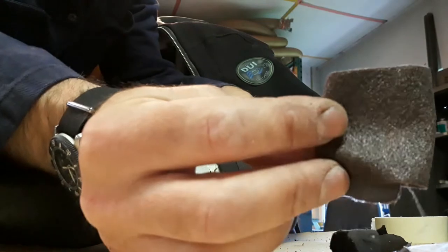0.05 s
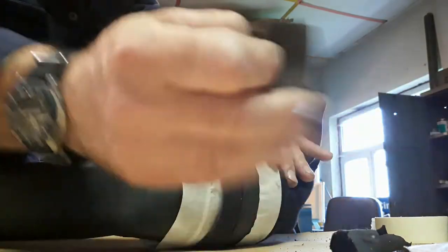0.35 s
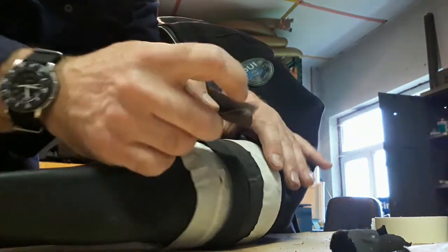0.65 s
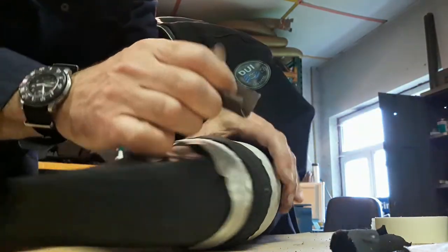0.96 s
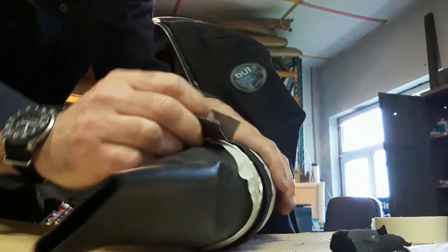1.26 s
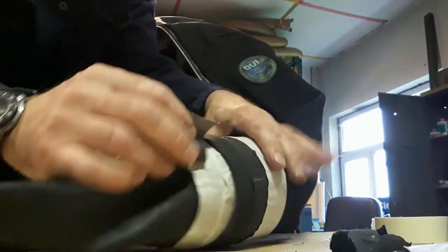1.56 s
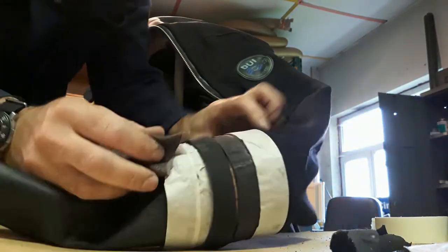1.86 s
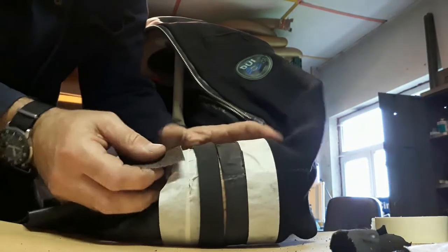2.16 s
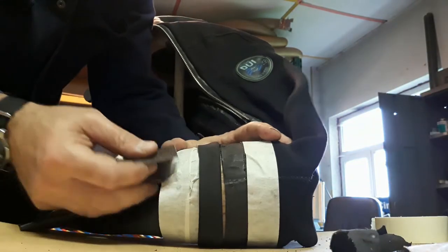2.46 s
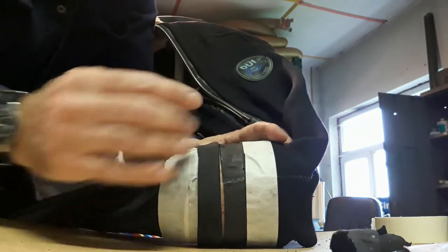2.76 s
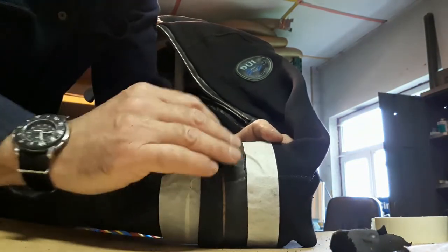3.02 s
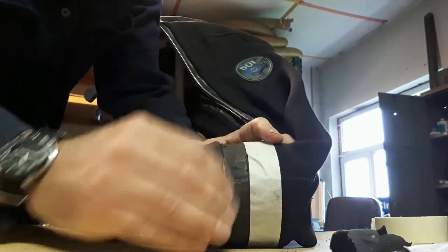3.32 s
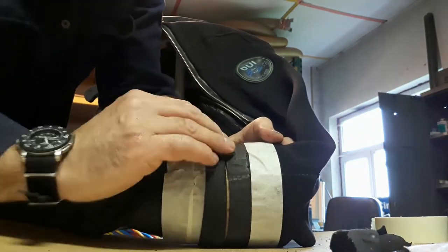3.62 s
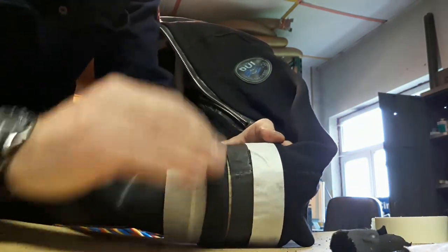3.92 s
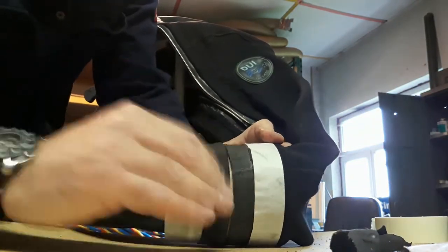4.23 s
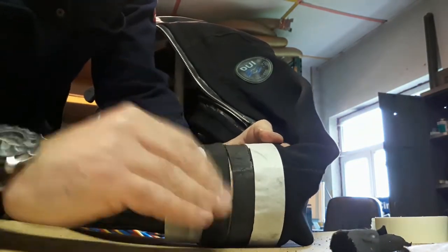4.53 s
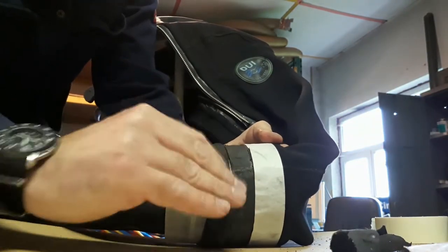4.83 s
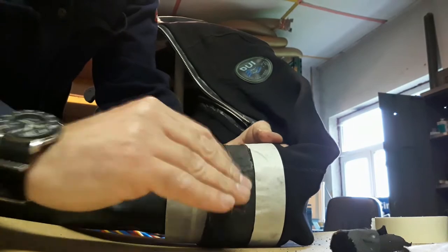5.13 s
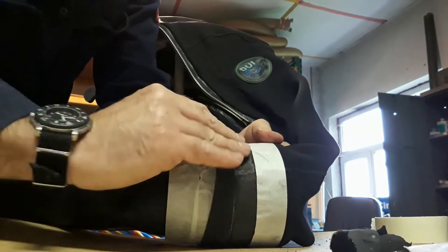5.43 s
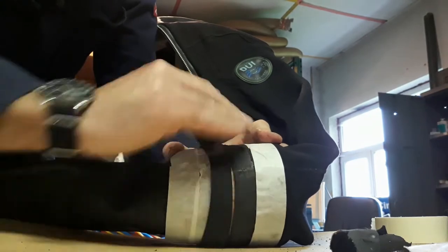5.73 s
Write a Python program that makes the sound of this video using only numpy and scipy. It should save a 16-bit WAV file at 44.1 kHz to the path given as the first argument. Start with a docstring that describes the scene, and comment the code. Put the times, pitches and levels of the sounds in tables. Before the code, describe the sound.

A taped rubber sleeve is turned on a workbench, rustling, swishing and knocking softly, with one brief creak from an abrasive pad. The stiff pad crackles in the fingers. Then it scrubs the rubber in quick, gritty strokes, about three a second, many landing with a dull thud that rings the bench. The microphone is close in a small room with faint rumble and hiss.

```python
"""A workbench in a small room, the microphone close and straight ahead, over a faint rumble and hiss.
First a taped rubber sleeve is turned: it rustles, swishes and knocks, and an abrasive pad creaks briefly.
The stiff pad crackles in the fingers, most densely at 2 to 2.5 s. From 3 s it scrubs the sleeve in quick
strokes, about three a second, its grains catching and letting go. Many strokes land with a dull thud
that rings the bench, and the room answers."""
import sys
import numpy as np
from scipy import signal
from scipy.fft import rfft, irfft
from scipy.io import wavfile
from scipy.ndimage import uniform_filter1d

SR = 44100
rng = np.random.default_rng(int(sys.argv[2]) if len(sys.argv) > 2 else 0)


def output_pcm(signal):
    """Save a mono or channel-first signal as 16-bit PCM at the path in sys.argv[1].

    Samples are clipped to [-1, 1] before scaling.
    """
    pcm = np.clip(np.atleast_2d(signal).T, -1, 1) * 32767
    wavfile.write(sys.argv[1], SR, np.round(pcm).astype(np.int16))


N = 259308
TIME = np.arange(N) / SR
CONTROL_TIME = TIME[::32]
TAPS = 4096
HZ = np.fft.rfftfreq(TAPS, 1 / SR)

# Steady rumble and hiss. Each row: frequency in Hz, relative level in dB.
BACKGROUND_COLOUR = [(18, -34), (30, -2), (102, 12), (328, 0.5), (426, -8), (662, -16), (4540, -21),
                     (6200, -38), (7430, -10), (10200, -11), (12200, -11), (15000, -56)]
# Decay of the room. Each row: frequency in Hz, time to fall 60 dB in seconds.
ROOM_DECAY = [(150, 0.7), (400, 0.84), (1000, 1.13), (1400, 0.5), (2800, 0.41), (7300, 0.64), (14000, 0.06)]
# Tone of the reflections. Each row: frequency in Hz, relative level in dB.
ROOM_COLOUR = [(100, -2.5), (500, 0), (950, -5.5), (1350, 10), (2000, 1), (3000, -1), (5200, -3.5),
               (9000, -2.5), (14000, 11.5)]
# Resonances of sleeve and bench. Each row: frequency in Hz, relative level in dB, t60 in seconds.
BENCH_MODES = [(84.6, -1.5, 0.14), (109, -0.5, 0.15), (149.7, 6, 0.1), (216.7, 1.5, 0.15),
               (300, -35, 0.046)]
# The hand lands on the sleeve. Each row: start in seconds, peak in dB, length of the push in seconds,
# level of the long low ring in dB.
HAND_THUDS = [(3.546, -43, 0.0032, -47.5), (3.617, -38.5, 0.0031, -62), (4.008, -32.5, 0.0072, -64),
              (4.133, -40, .01, -74), (4.331, -29.5, .0063, -58), (4.636, -30.5, 0.0065, -51.5),
              (4.744, -51.5, .003, -59), (4.927, -40, .0074, -47), (5.28, -41, 0.0026, -46.5),
              (5.434, -46, 0.0021, -49)]
# Bumps of the hollow sleeve. Each row: start in seconds, level in dB, pitch in Hz, t60 in seconds.
SLEEVE_KNOCKS = [(0.573, -45, 215, .14), (0.729, -46, 260, 0.067), (1.155, -42, 400, 0.033),
                 (1.972, -34, 655, 0.034), (2.012, -37.5, 196, 0.037), (2.919, -53, 205, 0.066),
                 (5.269, -38, 218, 0.13), (5.435, -45, 183.4, .12)]
# Pitched slides on tight rubber. Each row: start and end in seconds, first and last pitch in Hz,
# level in dB.
RUBBER_SWISHES = [(0.483, 0.625, 1100, 1120, -59), (1.221, 1.413, 393, 451, -60.5),
                  (1.243, 1.336, 4690, 5410, -47), (1.331, 1.403, 4045, 3700, -47.5),
                  (1.37, 1.425, 2700, 2284, -47), (1.74, 1.906, 3590, 3360, -44.5),
                  (1.752, 1.969, 540, 621.6, -55), (2.118, 2.193, 693, 607, -63.5),
                  (2.325, 2.407, 3060, 2890, -52.5), (3.214, 3.29, 2743, 2490, -44),
                  (3.57, 3.646, 472, 532, -57.5), (3.72, 3.879, 492, 536, -62),
                  (5.385, 5.434, 4460, 4400, -43.5)]
# The pad sticks and slips on its way down. Each row: time in seconds, typical peak in dB, slips a second.
PAD_CHATTER = [(.48, -42, 210), (.523, -29.5, 154), (0.539, -35, 80), (.59, -30, 110)]
# Fixed narrow peaks and dips that colour the rubbing and scrubbing.
# Each row: centre in Hz, width in Hz, gain in dB.
FRICTION_RIPPLE = [(987, 340, -9), (1247, 200, -4.5), (1718, 340, -7), (2720, 200, 1.5), (3154, 430, -3),
                   (3700, 160, 2), (4390, 87, 0), (5000, 270, 1), (5650, 140, 4), (6350, 110, 3.5),
                   (7260, 480, -3), (7750, 100, -11), (8930, 570, 2), (10000, 1730, -7.5), (13400, 120, 5),
                   (13900, 400, -7)]
# Tone of handled rubber. Each row: frequency in Hz, relative level in dB.
RUSTLE_COLOUR = [(29, -64), (50, -14.5), (214, -4.5), (314, -6.5), (518, -4), (876, -2.5), (1090, 0.5),
                 (1220, -6.5), (1880, -2.5), (3580, 4.5), (6820, -8.5), (8870, -7.5), (10200, -12.5),
                 (13600, -26.5), (15000, -57)]
# The sleeve turns and shifts under the hands. Each row: time in seconds, relative level in dB.
SLEEVE_TURNING = [(.08, -92), (.13, -76.5), (.41, -68.5), (.56, -55), (.77, -57.5), (.98, -65), (1.12, -68),
                  (1.16, -58), (1.42, -52.5), (1.66, -52.5), (1.8, -48), (2.03, -50), (2.12, -64.5),
                  (2.48, -61), (2.53, -54), (2.69, -82.5), (3.02, -64.5), (3.35, -74.5)]
# Fingers slide over rubber and tape. Each row: start and length in seconds, then in dB the relative
# level, swell from start to end, offset of the low part, offset of the fizz.
FINGER_RUBS = [(.112, 0.14, -67.5, 3.5, -9, -6), (.385, 0.033, -64.5, -3, -19, 1.5),
               (.46, 0.085, -52, -4, -15, -15), (.545, 0.051, -50.5, -3, -5.5, -12),
               (.81, 0.12, -57.5, 5, -28, -8.5), (1.245, 0.063, -47, -4, -11, -7),
               (1.322, 0.092, -41, -7.5, -20, -8), (1.53, 0.056, -45.5, 2.5, -3, -9),
               (1.756, .021, -35.5, -4, -14, -2.5), (1.783, 0.11, -44, 4, -14, -3.5),
               (2.155, 0.05, -49.5, 17, -8, -6.5), (2.308, 0.072, -48, -5, -5.5, -4.5),
               (2.56, 0.042, -62, 17, -10, -3.5), (2.745, 0.13, -61.5, -4.5, -3, -6.5),
               (3.47, 0.074, -64.5, 14.5, 3, -6), (5.32, 0.059, -60, -2, -18, -9.5)]
# Tone of a snap. Each row: frequency in Hz, relative level in dB.
SNAP_COLOUR = [(150, -31), (600, -7), (1200, -11.5), (1700, -8), (2400, 2), (4300, 0), (8500, 3),
               (11000, -1), (15000, -21)]
# The stiff pad snaps. Each row: start in seconds, relative peak in dB, ring pitch in Hz,
# low part and treble in dB against the middle.
PAD_SNAPS = [(0.135, -42, 3500, -35, -10.5), (.715, -32.5, 2630, -21, 0), (1.1523, -29.5, 4110, -18, 1),
             (1.4448, -25, 3820, -31, -16), (1.4602, -26.5, 2470, -20, -8), (1.5132, -14, 2600, -44, -18),
             (1.5148, -16, 4000, -35, -18), (1.7311, -20.5, 3400, -23, -3), (1.929, -20, 2710, -23, 14),
             (1.9686, -26, 3740, -18, 8), (1.9907, -15, 4100, -10.5, -5.5), (1.9959, -12, 3750, -31, -2.5),
             (2.008, -13, 3500, -39, -11), (2.011, -15.5, 4240, -7, 5), (2.019, -20, 2260, -31, -16),
             (2.0302, -15, 3350, -31, -4), (2.0364, -15, 5800, -9.5, -3.5), (2.061, -29, 4110, -22, -16),
             (2.0822, -18, 4360, -27, -8), (2.201, -15.5, 4500, -50, -19), (2.3226, -23.5, 5750, -22, -9),
             (2.425, -20, 2670, -3, 4.5), (2.4342, -12.5, 4520, -10, 0), (2.4569, -8, 6240, -39, 7),
             (2.4645, -17.5, 2850, -4.5, -1), (2.4945, -19, 2800, -15, -16), (2.5025, -9, 2580, -12, -2.5),
             (2.5076, -6.5, 4250, -33, -4.5), (2.508, -13, 2470, 5, -14.5), (3.585, -23, 4390, -25, -5),
             (4.8972, -27, 4600, -18, -6), (4.9546, -19.5, 2580, -9, -13), (5.171, -21.5, 6740, -37, 8),
             (5.1946, -15, 4740, -31, -9), (5.238, -24, 2660, -18, -33)]
# Tone of abrasive on rubber. Each row: frequency in Hz, relative level in dB.
RASP_COLOUR = [(190, -40.5), (330, -25), (447, -22.5), (1010, 2.5), (1260, -11.5), (1660, -11),
               (1880, -3.5), (2170, -7.5), (2810, -1), (4250, -1.5), (5070, -7.5), (8450, -7), (10200, -13),
               (12600, -20), (15000, -43.5)]
# The pad's edge catches as it lands or lifts. Each row: start in seconds, relative level in dB,
# offset of the fizz in dB.
EDGE_CATCHES = [(3.475, -57.5, -11), (4, -49, -5.5), (4.428, -37.5, 5.5), (4.617, -49, -10),
                (4.746, -40.5, 2), (4.892, -47.5, -4.5), (4.916, -48, -6), (5.03, -48, 4),
                (5.192, -43, -4.5), (5.232, -58, -18), (5.27, -45, -9.5), (5.386, -49, -5.5),
                (5.72, -49.5, -12)]
# Hard pushes and light returns of the pad. Each row: start and length in seconds, then in dB the relative
# level, swell from start to end, offset of the low part, offset of the fizz, relative hum of the sleeve.
PAD_STROKES = [(3.025, 0.15, -51, -3.5, -8, -8, -59), (3.177, 0.084, -45, 10, -5, -8, -55),
               (3.528, 0.086, -55.5, 14.5, 3, -6.5, -47), (3.677, 0.09, -39, 0, -20.5, -4, -46),
               (3.768, 0.084, -62, -8, -5, 0, -53), (3.993, 0.13, -43, 8, -14.5, -3.5, -46.5),
               (4.128, .062, -52, -12, -3, -1.5, -48.5), (4.322, .12, -39.5, 1.5, -14, -4, -47.5),
               (4.623, 0.14, -41, -6.5, -12, -3.5, -52.5), (4.774, 0.24, -61.5, 9, -8, -3, -59),
               (4.932, 0.11, -40.5, 6, -10.5, -6.5, -47.5), (5.193, 0.093, -47.5, -1.5, -12, -7, -52),
               (5.386, 0.056, -45, -2, -17, -5, -43), (5.433, 0.075, -36, 10, -11, -6, -43),
               (5.724, 0.06, -43, -0.5, -8.5, -9, -44), (5.841, 0.041, -31, 16.5, -14, -6, -42.5)]


def amp(db):
    """Decibels to gain."""
    return 10 ** (np.asarray(db) / 20)


def unit_rms(x):
    """Scales to rms 1."""
    return x / np.sqrt(np.mean(x ** 2) + 1e-20)


def curve_at(points, hz):
    """Reads a table on a log-frequency axis."""
    f, value = np.transpose(points)
    return np.interp(np.log(hz + 1), np.log(f + 1), value)


def at_samples(control):
    """A slow control at every sample."""
    return np.interp(TIME, CONTROL_TIME, control)


def add(mix, start_s, sound):
    """Mixes a sound in at its start time."""
    part = mix[max(round(start_s * SR), 0):][:len(sound)]
    part += sound[:len(part)]


def low_cut(x, hz):
    """Rolls off what lies below hz."""
    return signal.sosfilt(signal.butter(2, hz, "high", fs=SR, output="sos"), x)


def response(colour_db):
    """The minimum-phase impulse response that has this colour."""
    log_gain = np.log(amp(np.maximum(colour_db, -100)))
    mirrored = np.concatenate([log_gain, log_gain[-2:0:-1]])
    return irfft(np.exp(np.conj(signal.hilbert(mirrored)))[:len(HZ)])


def coloured(x, colour_db):
    """Filters by a colour, to rms 1."""
    return unit_rms(signal.oaconvolve(x, response(colour_db))[:len(x)])


def registers(colour_db, low_hz=1400, high_hz=6200):
    """Splits a colour into its low, middle and high parts."""
    low = 1 / (1 + (HZ / low_hz) ** 8)
    high = 1 - 1 / (1 + (HZ / high_hz) ** 8)
    return [colour_db + 10 * np.log10(share + 1e-9) for share in (low, (1 - low) * (1 - high), high)]


def waver(rate_hz):
    """A random wobble of rms 1, mostly slower than rate_hz."""
    hz = np.fft.rfftfreq(N, 1 / SR)
    return unit_rms(irfft(rfft(rng.standard_normal(N)) / (1 + (hz / rate_hz) ** 4), N))


def mode(hz, t60, rise_s):
    """One dying resonance with a soft start."""
    t = np.arange(SR) / SR
    return amp(-60 * t / t60) * np.sin(2 * np.pi * hz * t) * (1 - np.exp(-t / rise_s))


def slide(start, length, rise_s, fall_s):
    """The speed of one movement: it gathers, holds and dies away."""
    t = CONTROL_TIME - start
    return (1 + np.tanh(2 * t / rise_s - 1)) / 2 * np.exp(-np.maximum(t - length, 0) / fall_s)


def background(level_db=-74.5):
    """A steady low rumble and thin hiss lie behind everything."""
    return amp(level_db) * coloured(rng.standard_normal(N), curve_at(BACKGROUND_COLOUR, HZ))


def room(near, delay_s=0.004, echoes_per_s=4000):
    """Sparse reflections come back to the microphone, each band dying at its own speed."""
    echoes = rng.choice([-1., 1.], SR) * (rng.random(SR) < echoes_per_s / SR)
    echoes *= np.arange(SR) > delay_s * SR
    hz, t, spectra = signal.stft(echoes, SR, nperseg=256)
    db = curve_at(ROOM_COLOUR, hz)[:, None] - 60 * t / curve_at(ROOM_DECAY, hz)[:, None]
    tail = signal.istft(spectra * amp(db), SR, nperseg=256)[1]
    return signal.fftconvolve(near, tail / np.linalg.norm(tail))[:N]


def bench(hum_db=-4):
    """Soft pushes of the hand and the judder of the pad ring the sleeve and the bench under it."""
    t = np.arange(SR) / SR
    body = sum(amp(db - 60 * t / t60) * np.cos(2 * np.pi * hz * t) for hz, db, t60 in BENCH_MODES)
    body = low_cut(body, hz=62)
    thuds = np.zeros(N)
    for start, db, length, ring_db in HAND_THUDS:
        push = np.sin(2 * np.pi * np.minimum(t / length, 1))  # the rubber gives and springs back
        thud = signal.fftconvolve(body, push)[:SR]
        add(thuds, start, amp(db) * thud / abs(thud).max())
        # one lightly damped resonance of the bench outlasts the rest
        add(thuds, start, amp(ring_db) * mode(hz=193.3, t60=0.74, rise_s=0.0018))
    pressing = sum((amp(db + hum_db) * slide(start, length, rise_s=0.018, fall_s=0.017)) ** 2
                   for start, length, *_, db in PAD_STROKES)
    judder = rng.standard_normal(N) * at_samples(np.sqrt(pressing))
    hollow = low_cut(body, hz=120)
    hum = signal.fftconvolve(judder, hollow / np.linalg.norm(hollow))[:N]
    return thuds + hum


def sleeve_knocks():
    """Each bump rings one dull resonance of the hollow sleeve."""
    out = np.zeros(N)
    for start, db, hz, t60 in SLEEVE_KNOCKS:
        add(out, start, amp(db) * mode(hz, t60, rise_s=0.00088))
    return out


def rubber_swishes(relative_width=0.19):
    """Fine slips feed one resonance that glides as the rubber stretches."""
    out = np.zeros(N)
    for start, end, first_hz, last_hz, db in RUBBER_SWISHES:
        size = round((end - start) * SR)
        smooth = signal.butter(2, relative_width * first_hz / 2, fs=SR, output="sos")
        slips = signal.sosfilt(smooth, rng.standard_normal(SR) + 1j * rng.standard_normal(SR))[-size:]
        glide = np.exp(2j * np.pi * np.cumsum(np.linspace(first_hz, last_hz, size)) / SR)
        add(out, start, amp(db) * unit_rms((slips * glide).real) * signal.windows.tukey(size, 0.51))
    return out


def ripple_db():
    """Fixed narrow peaks and dips that colour the rubbing, creaking and scrubbing."""
    return sum(db / (1 + (2 * (HZ - hz) / width) ** 2) for hz, width, db in FRICTION_RIPPLE)


def pad_chatter(jitter=0.22, uneven_db=2):
    """Stick and slip: a short creaking run of ticks at an uneven rate."""
    times, *columns = np.transpose(PAD_CHATTER)
    level_db, rate = (np.interp(TIME, times, column) for column in columns)
    cycles = np.cumsum(rate * np.exp(jitter * waver(rate_hz=100))) / SR
    slips = np.diff(np.floor(cycles), prepend=0) * (TIME > times[0]) * (TIME < times[-1])
    slips *= amp(level_db + uneven_db * rng.standard_normal(N))
    tick = response(curve_at(RUSTLE_COLOUR, HZ) + ripple_db())
    return signal.oaconvolve(slips, tick / abs(tick).max())[:N]


def grit(per_s, spread_db, clump_db, clump_hz):
    """Grains catch and let go: tiny clicks of uneven size, in clumps where the contact sticks."""
    size = amp(spread_db * np.minimum(rng.exponential(1, N), 4.5))
    clicks = size * rng.choice([-1, 1], N) * (rng.random(N) < per_s / SR)
    return clicks * amp(clump_db * waver(clump_hz))


def shifting_contact(grains, depth_db):
    """The contact patch keeps changing, so its resonances come and go."""
    spectra = signal.stft(grains, nperseg=256)[2]
    patches = uniform_filter1d(rng.standard_normal(spectra.shape), size=4, axis=0)  # across frequency
    patches = uniform_filter1d(patches, size=14, axis=1)  # across time
    return signal.istft(spectra * amp(depth_db * unit_rms(patches)), nperseg=256)[1][:N]


def friction_power(moves, rise_s, fall_s, low_exponent=0.78, fizz_exponent=1.01):
    """Power of the low part, the middle and the fizz, each growing with the sliding speed."""
    power = np.zeros((3, len(CONTROL_TIME)))
    for start, length, db, swell_db, low_db, fizz_db, *_ in moves:
        progress = np.clip((CONTROL_TIME - start) / length, 0, 1)
        speed = slide(start, length, rise_s, fall_s) * amp(swell_db * (progress - .5))
        bands = [amp(low_db) * speed ** low_exponent, speed, amp(fizz_db) * speed ** fizz_exponent]
        power += (amp(db) * np.array(bands)) ** 2
    return power


def rub(power, colour, grains, low_db, mid_db, high_db, air_db, air_growth=2.6, air_hz=11500):
    """Grains sound through the pad: pressure brings out the low part, speed the fizz."""
    below_db, level_db, above_db = (at_samples(10 * np.log10(band + 1e-14)) for band in power)
    pressure_db, fizz_db = below_db - level_db, above_db - level_db
    low, mid, high = (coloured(grains, db) for db in registers(curve_at(colour, HZ) + ripple_db()))
    air = unit_rms(low_cut(low_cut(high[::-1], air_hz), air_hz))
    air *= amp(air_growth * np.minimum(fizz_db, 2) + air_db)  # the finest grains grow fastest with speed
    treble = amp(fizz_db + high_db) * high + air
    return amp(level_db) * (amp(pressure_db + low_db) * low + amp(mid_db) * mid + treble)


def handling():
    """The sleeve turns and the fingers slide loosely over rubber and tape."""
    grains = grit(per_s=6000, spread_db=3.5, clump_db=1.3, clump_hz=67.4)
    grains = shifting_contact(grains, depth_db=3.0)
    turning = amp(np.interp(CONTROL_TIME, *np.transpose(SLEEVE_TURNING)))
    balance = amp([[-4], [0], [-10]])  # hollow low part, middle, fine fizz
    power = (turning * balance) ** 2 + friction_power(FINGER_RUBS, rise_s=0.024, fall_s=0.0093)
    return rub(power, RUSTLE_COLOUR, grains, low_db=0.47, mid_db=-0.07, high_db=5.5, air_db=-9)


def pad_snaps(ring_width_hz=1200, crumble=0.11, crumble_s=0.0026, dispersion=0.0747, gain_db=-7):
    """One sharp release and a short crumble of grains ring the pad for a few cycles."""
    out, t = np.zeros(N), np.arange(TAPS) / SR
    bending = np.exp(-2j * np.pi * dispersion * np.sqrt(HZ))  # in a sheet the treble travels fastest
    for start, db, hz, low_db, treble_db in PAD_SNAPS:
        release = (t == 0) + crumble * rng.standard_normal(TAPS) * np.exp(-t / crumble_s)
        ring_db = (6 - 0.53 * treble_db) / (1 + (2 * (HZ - hz) / ring_width_hz) ** 2)  # dull ones ring more
        bands_db = registers(curve_at(SNAP_COLOUR, HZ) + ring_db)
        low, mid, high = (unit_rms(amp(band)) ** 2 for band in bands_db)
        colour_db = 10 * np.log10(amp(low_db) ** 2 * low + mid + amp(treble_db) ** 2 * high)
        snap = irfft(rfft(coloured(release, colour_db)) * bending)
        add(out, start, amp(db + gain_db) * snap / abs(snap).max())
    return out


def scrubbing(catch_s=0.013, catch_low_db=-7.5):
    """The pressed pad drags thousands of grains a second over the rubber and lifts between strokes."""
    grains = grit(per_s=14000, spread_db=3.0, clump_db=1.43, clump_hz=111)
    grains = shifting_contact(grains, depth_db=4.0)
    catches = [(start, catch_s, db, 0, catch_low_db, fizz_db) for start, db, fizz_db in EDGE_CATCHES]
    power = friction_power(PAD_STROKES, rise_s=0.039, fall_s=0.014)
    power += friction_power(catches, rise_s=0.0077, fall_s=0.0069)
    return rub(power, RASP_COLOUR, grains, low_db=-3.0, mid_db=3.5, high_db=5, air_db=-2)


def scene(room_db=-16):
    """The work is close to the microphone and straight ahead, so both channels are alike."""
    near = handling() + pad_chatter() + rubber_swishes() + sleeve_knocks()
    near += scrubbing() + pad_snaps() + bench()
    mono = background() + near + amp(room_db) * room(near)
    return np.array([mono, mono])


def record(dry):
    """The recorder passes nothing much above 15 kHz."""
    band_limit = signal.firwin(511, cutoff=15100, window=("kaiser", 9), fs=SR)
    return signal.oaconvolve(dry, band_limit[None], "same", axes=1)


dry = scene()
out = record(dry)
output_pcm(out)
```